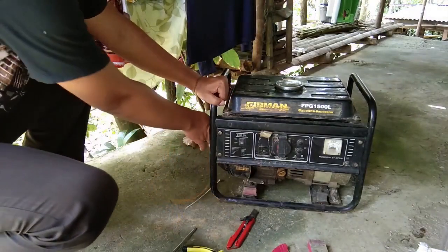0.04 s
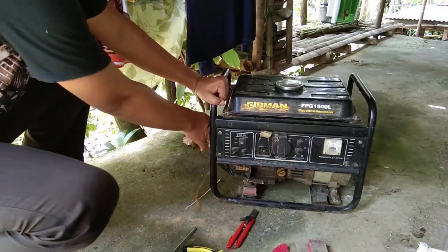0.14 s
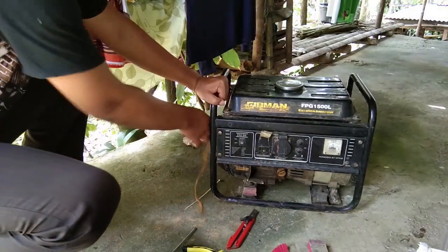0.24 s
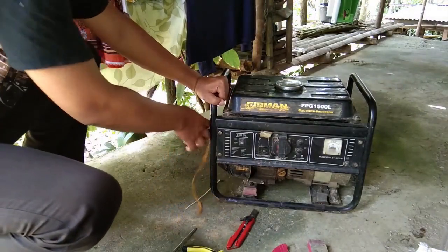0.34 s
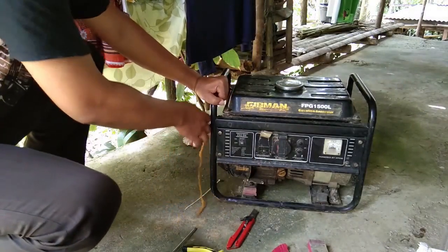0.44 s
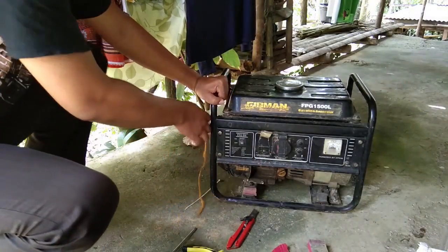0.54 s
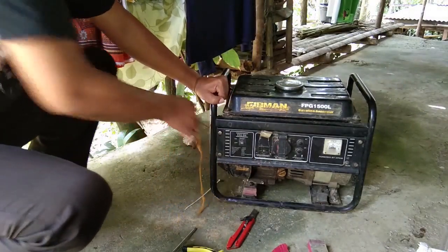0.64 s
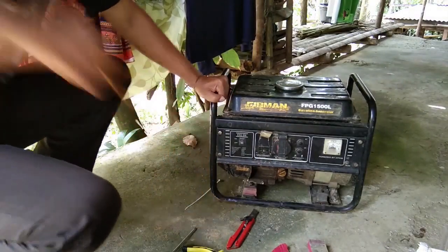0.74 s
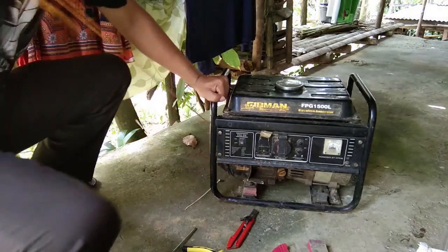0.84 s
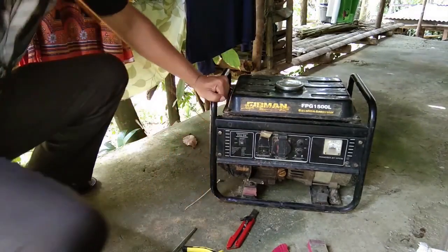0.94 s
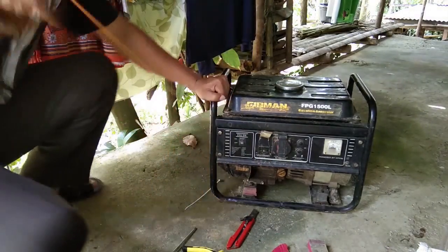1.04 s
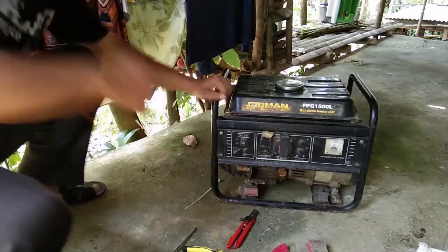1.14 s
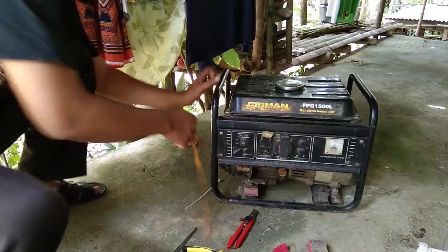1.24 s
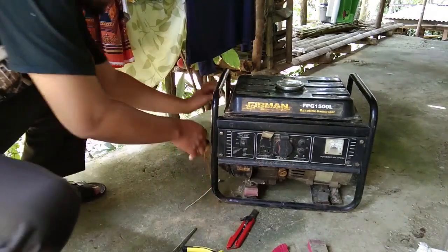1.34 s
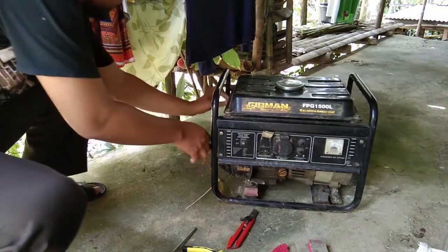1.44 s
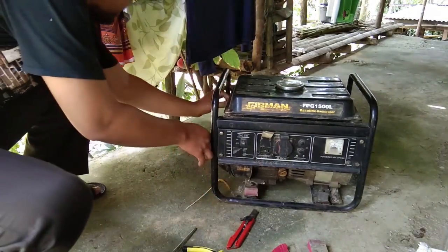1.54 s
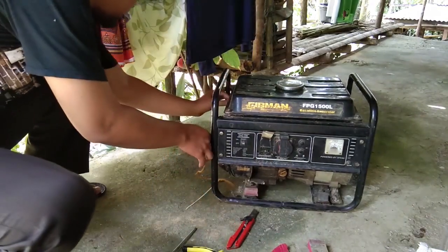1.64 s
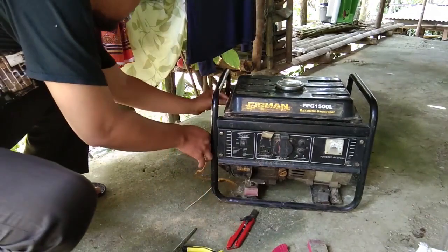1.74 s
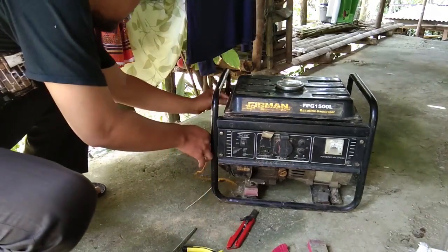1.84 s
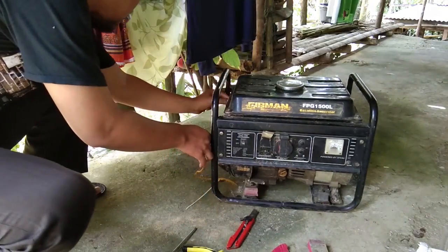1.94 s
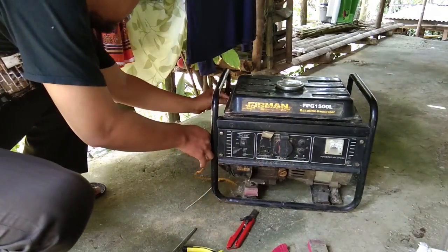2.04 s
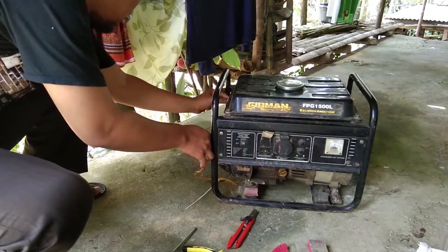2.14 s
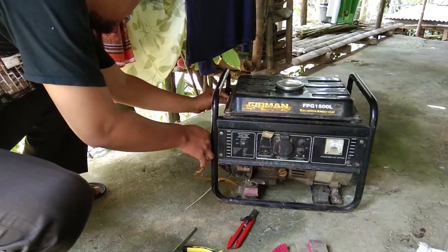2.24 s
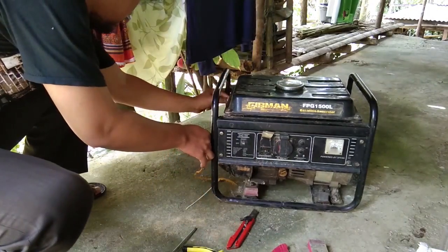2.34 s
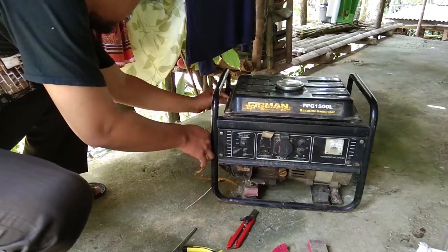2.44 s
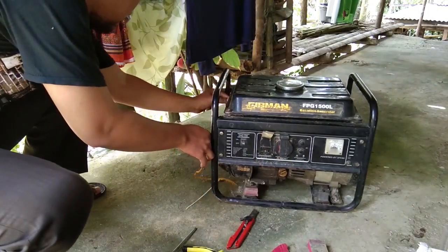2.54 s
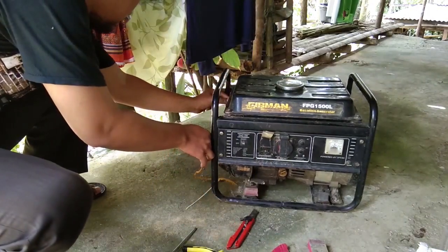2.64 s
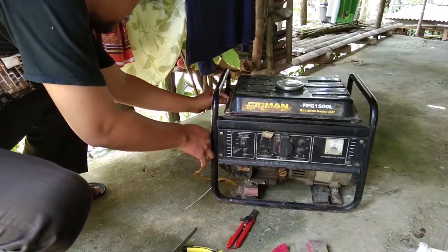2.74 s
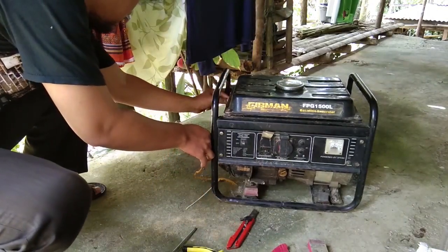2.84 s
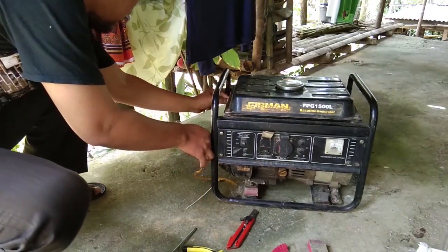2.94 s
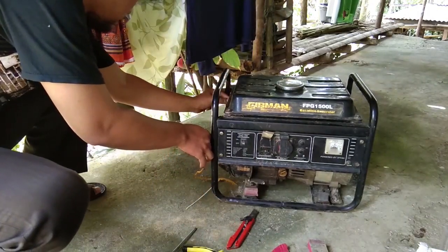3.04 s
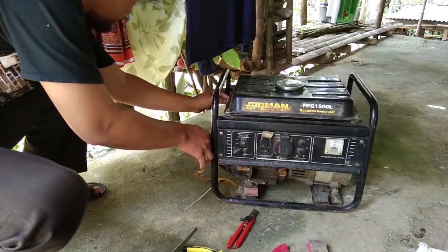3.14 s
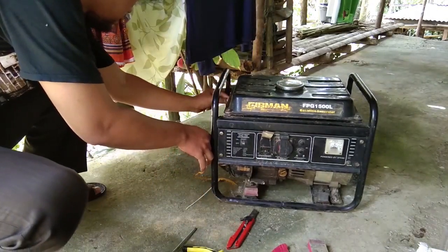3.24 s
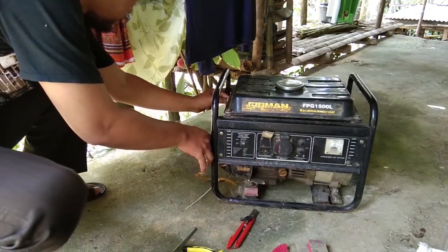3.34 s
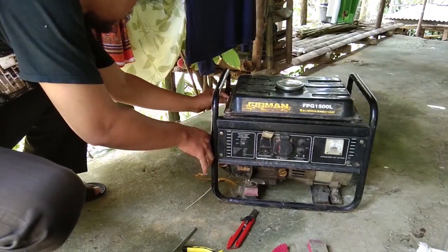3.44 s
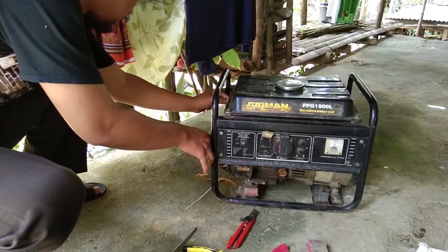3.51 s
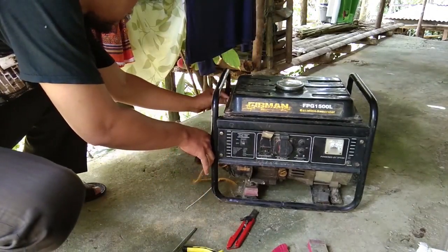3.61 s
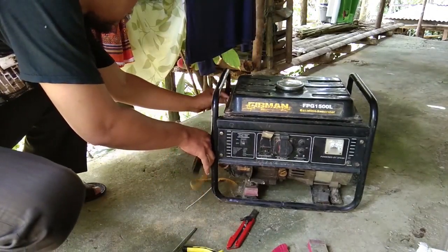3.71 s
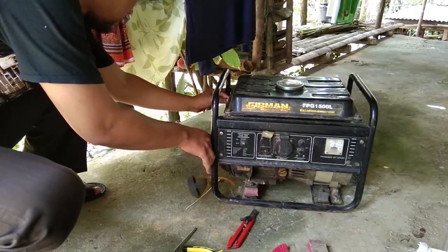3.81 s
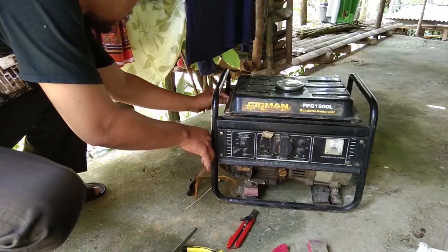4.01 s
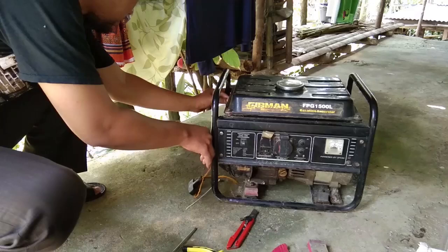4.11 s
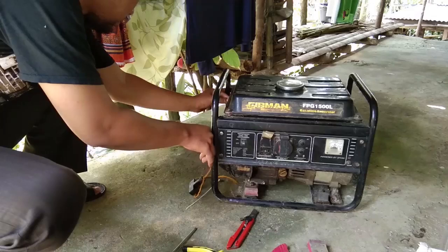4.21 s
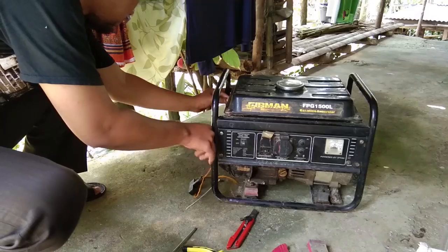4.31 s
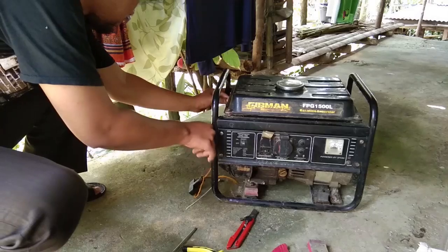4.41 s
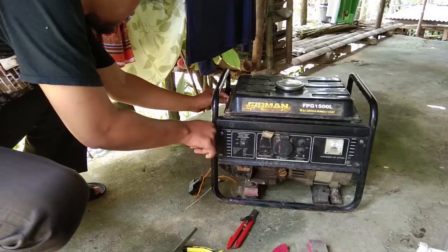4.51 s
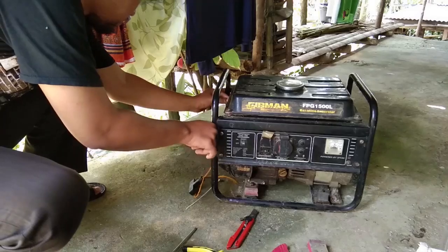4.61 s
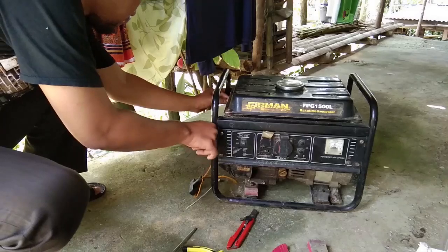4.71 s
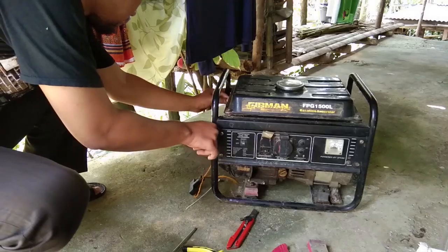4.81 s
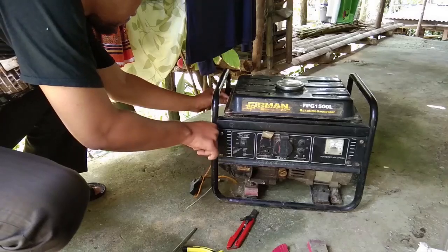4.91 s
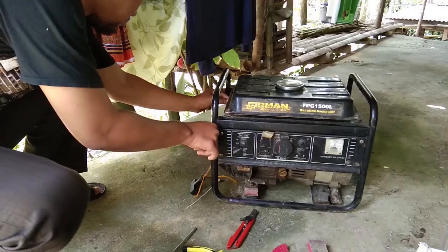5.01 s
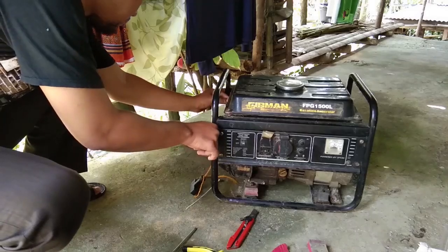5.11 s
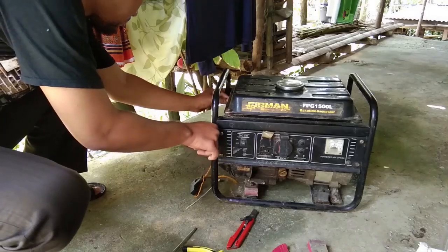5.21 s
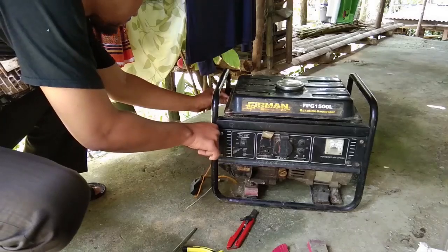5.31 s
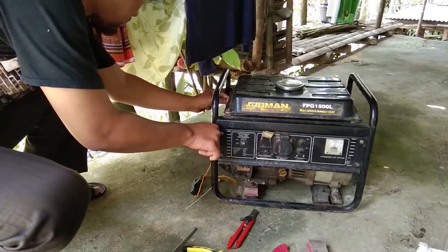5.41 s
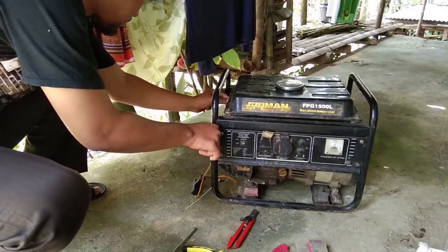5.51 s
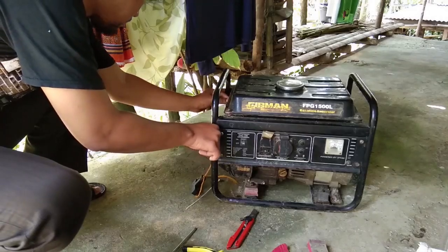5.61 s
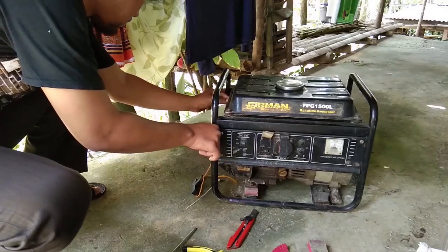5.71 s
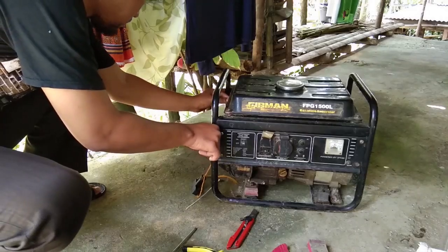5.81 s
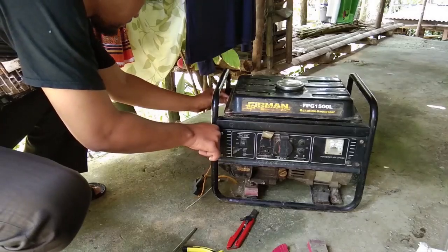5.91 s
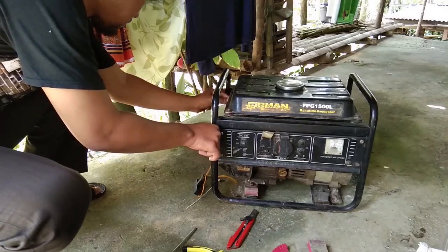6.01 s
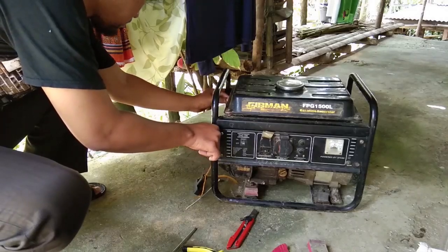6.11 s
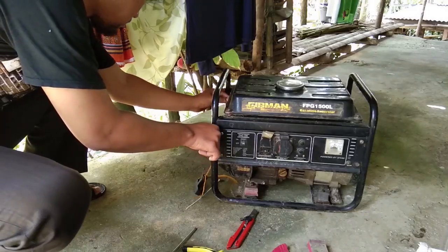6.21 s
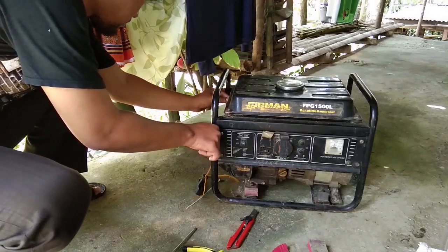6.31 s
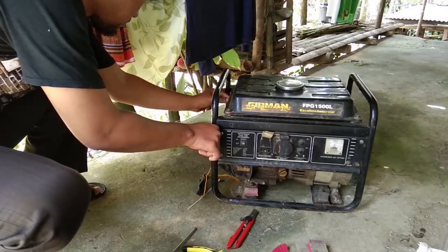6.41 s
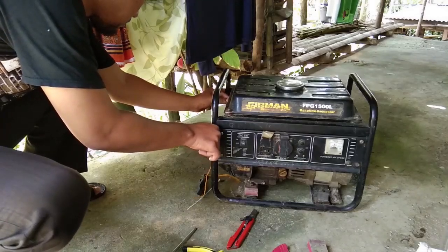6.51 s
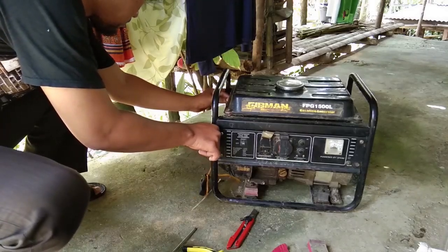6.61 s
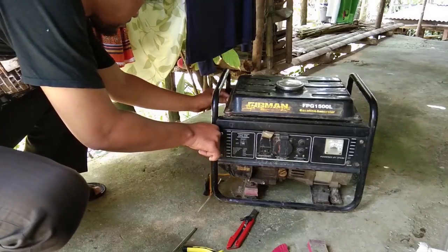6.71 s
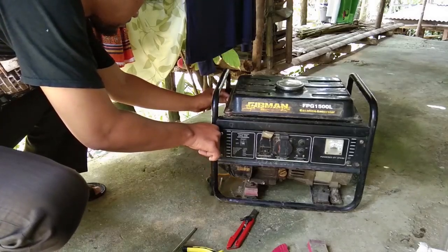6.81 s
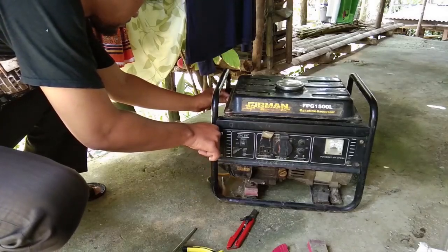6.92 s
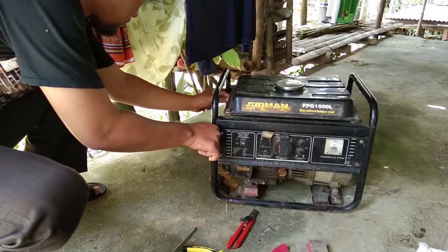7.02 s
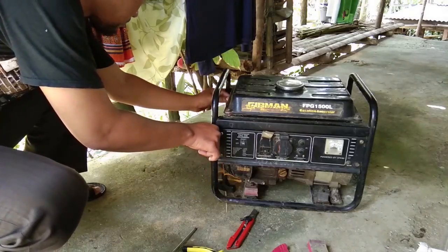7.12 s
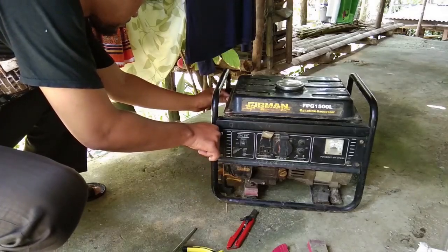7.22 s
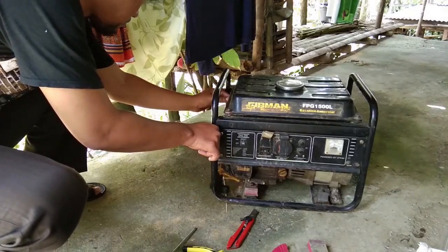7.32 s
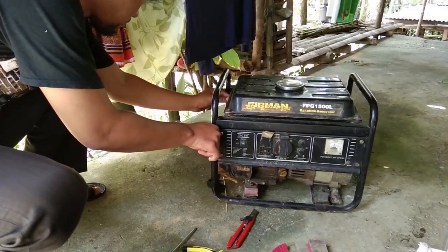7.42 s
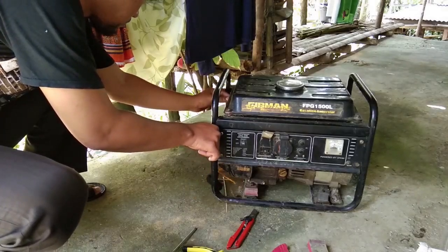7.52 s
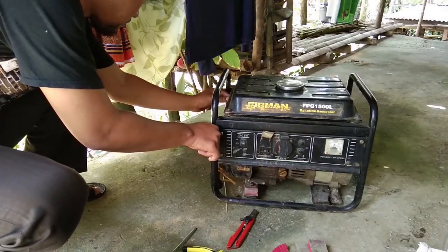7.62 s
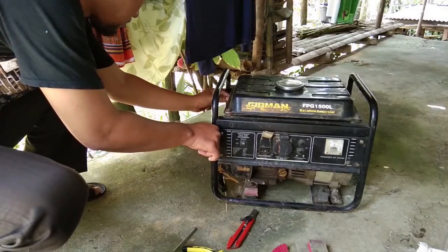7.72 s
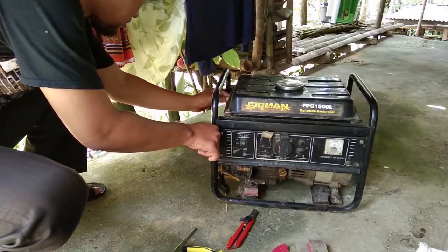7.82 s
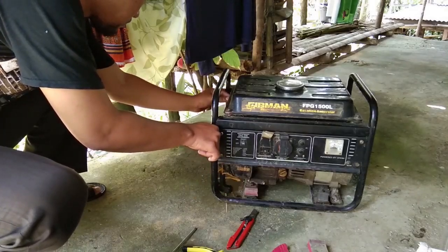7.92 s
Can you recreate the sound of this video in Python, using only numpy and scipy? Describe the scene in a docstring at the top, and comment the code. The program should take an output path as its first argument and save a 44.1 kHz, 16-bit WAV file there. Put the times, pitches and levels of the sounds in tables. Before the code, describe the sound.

Quiet clicks, a harsh rope pull and muffler puffs, then a small four-stroke engine catches, sags, picks up and putters on steadily with metallic clatter.

```python
"""A small four-stroke petrol generator is pull-started on a concrete floor under an open shelter, in a quiet yard.
The starter clicks, the rope rasps as shaped noise and the muffler puffs: compressions, then first firing.
The engine catches, nearly stalls, picks up and lopes: strong and weak burns alternate, with a few stumbles.
Each burn excites the muffler resonances and a rush of gas noise; one burn spits sharply.
Valves and piston knock on every cycle, and damped modes of the casing ring on."""
import sys
import numpy as np
from scipy import signal
from scipy.fft import rfft, irfft, next_fast_len
from scipy.io import wavfile
from scipy.ndimage import uniform_filter1d

SR = 44100
rng = np.random.default_rng(int(sys.argv[2]) if len(sys.argv) > 2 else 0)


def inscribe(sig):
    """Save sig as 16-bit PCM at rate SR to the path in sys.argv[1].

    A 1-D sig is mono; a 2-D sig holds one channel per row.
    Samples are clipped to [-1, 1] before scaling.
    """
    pcm = np.round(np.clip(np.atleast_2d(sig).T, -1, 1) * 32767)
    wavfile.write(sys.argv[1], SR, pcm.astype(np.int16))


N = 350595
TIME = np.arange(N) / SR
FIRST_CYCLE_S = 1.182
CRUISE_RATE = 21.66  # cycles per second: reference speed for the levels

# colour of the gas pushed by the piston, before scaling to rms 1: frequency_hz, density_db (per Hz)
GAS_SPECTRUM = [(200, -31), (600, 2), (800, 11.5), (1200, -8), (2100, -12.5), (3000, -7), (4500, 4.5),
                (5900, 2.5), (6700, 3), (7600, -32)]


def amp(db):
    """Level definition: decibels to linear gain."""
    return 10 ** (np.asarray(db) / 20)


def level(x, db):
    """Energy normalisation: scale a signal to an rms level in dB."""
    return x * amp(db) / np.sqrt(np.mean(x ** 2))


def noise(spectrum):
    """Spectral shaping: white noise weighted in frequency, with rms 1."""
    hz, db = np.transpose(spectrum)
    size = next_fast_len(N)
    f = np.fft.rfftfreq(size, 1 / SR) + 1e-3  # keeps the logarithm finite
    weights = amp(np.interp(np.log(f), np.log(hz), db))
    white = rng.standard_normal(size)
    return level(irfft(rfft(white) * weights, size)[:N], 0)


def through(x, response):
    """Linear superposition: convolve a sound with an impulse response."""
    return signal.oaconvolve(x, response)[:N]


def pulses(times, sizes):
    """Impulsive excitation: one single-sample impulse at each time."""
    return np.bincount(np.clip(times * SR, 0, N).astype(int), sizes, N + 1)[:N]


def ring(modes):
    """Damped resonance: decaying sines, normalised so that each has its dB gain at the centre frequency."""
    t = TIME[:SR // 5]
    response = 0
    for hz, width, db in modes:
        decay = np.exp(-np.pi * width * t)
        response = response + amp(db) * 2 * np.pi * width / SR * decay * np.sin(2 * np.pi * hz * t)
    return response


def burst(rise_s, decay_s):
    """Charge and discharge: an envelope that swells and dies away exponentially, with peak 1."""
    t = TIME[:SR // 4]
    shape = (1 - np.exp(-t / rise_s)) * np.exp(-t / decay_s)
    return shape / shape.max()


def grain(rate, spread_db, decay_s):
    """Random impulse train: many tiny bursts of uneven size make a gritty envelope of rms 1."""
    chance, size = rng.random(N), rng.standard_normal(N)
    bursts = (chance < rate / SR) * amp(spread_db * np.clip(size, -2, 2))
    return level(signal.lfilter([1], [1, -np.exp(-1 / (decay_s * SR))], bursts), 0)


def cycle_rate():
    """Rotational kinematics: four-stroke cycles per second, straight lines between the given points."""
    # engine speed: time_s, rate (cycles per second)
    speed_points = [(1.18, 13.63), (1.35, 16.83), (1.81, 14.79), (2.13, 12.06), (2.58, 20.39),
                    (2.87, 18.45), (3.32, 17.2), (3.81, 18.85), (4.02, 17.71), (4.2, 18.36), (4.62, 17.86),
                    (5.16, 20.12), (5.46, 19.82), (5.63, 18.54), (6.11, 18.04), (6.62, 21.79),
                    (7.49, 24.25), (7.95, 24.2)]
    time_s, rate = np.transpose(speed_points)
    return np.interp(TIME, time_s, rate)


def effort(db_per_rate, choked_db):
    """Load dependence: gain follows engine speed, with an offset while the cold engine runs choked."""
    clears_s, clearing_s = 2.245, 0.025
    choked = np.clip(1 - (TIME - clears_s) / clearing_s, 0, 1)
    return amp(db_per_rate * (cycle_rate() - CRUISE_RATE) + choked_db * choked)


def throttle(db_per_gain=.2, limit=7):
    """Intake opening: gain rises as the engine gathers speed (dB per cycle per second gained each second)."""
    gaining = uniform_filter1d(np.gradient(cycle_rate()) * SR, size=SR // 8)
    return amp(db_per_gain * np.clip(gaining, -limit, limit))


def cycles():
    """Residual-gas alternation: a strong burn spoils the next charge, a weak one leaves it clean.

    Returns the start, length and burn strength of each cycle."""
    # spells when every cycle burns alike: from_s, to_s, burn_db (before the speed gain)
    # they cover catching, nearly stalling, picking up, then stumbles
    spells = [(1.14, 1.41, -0.5), (1.72, 2.08, -10), (2.23, 2.3, -1.5), (2.3, 2.54, -1.5),
              (5.34, 5.39, -0.5), (5.54, 5.59, -23), (5.59, 5.70, -5.5), (5.92, 6.03, -6)]
    spoiled_db, spoils_above_db = -11, -5
    rate = cycle_rate()
    running = TIME >= FIRST_CYCLE_S
    turns = np.cumsum(rate * running) / SR
    starts = np.interp(np.arange(int(turns[-1]) + 1), turns[running], TIME[running])
    burn_db, spoiled = [], False
    for start in starts:
        spell = [db for begin, end, db in spells if begin <= start < end]
        if spell:
            burn_db.append(spell[0])
        else:
            burn_db.append(spoiled_db if spoiled else 0)
        spoiled = burn_db[-1] > spoils_above_db
    burn = amp(burn_db) * np.interp(starts, TIME, effort(db_per_rate=0.22, choked_db=1.0))
    return starts, 1 / np.interp(starts, TIME, rate), burn


def yard():
    """Diffuse background: steady, faint noise with the colour of a quiet yard."""
    # before scaling: frequency_hz, density_db (per Hz)
    yard_spectrum = [(15, -38), (25, -7.5), (121, 5), (175, -7), (215, -1.5), (290, -11.5), (410, -9),
                     (550, -15.5), (740, -15), (850, -10.5), (950, -20), (1300, -17.5), (1550, -22.5),
                     (1770, -17), (2250, -24), (2950, -29.5), (3550, -21.5), (4500, -27), (6910, -22),
                     (7600, -38), (9880, -56.5), (16700, -120)]
    return amp(-54.5) * noise(yard_spectrum)


def shelter(x, t60_s=0.27, bounce_s=0.0006167, bounce_db=-13):
    """Reflection and scattering: the floor mirrors the sound, roof and posts scatter a short, light tail."""
    x = x + amp(bounce_db) * np.interp(TIME - bounce_s, TIME, x, left=0)
    t = TIME[:SR // 2]
    tail = rng.standard_normal(len(t)) * amp(-60 * t / t60_s) * (t > .003)
    # the bass escapes through the open sides
    tail = signal.sosfilt(signal.butter(2, 400, "high", fs=SR, output="sos"), tail)
    return x + amp(-13) * through(x, tail / np.linalg.norm(tail))


def casing(x):
    """Modal resonance: casing, tank and frame modes lift narrow bands and ring on, with hollows between."""
    # peaks and hollows: frequency_hz, width_hz, lift_db (of its own filter)
    casing_modes = [(257.1, 6.6, 7.5), (287.2, 20, -1.5), (340, 15, -5), (370, 18, 1), (404.5, 25, -4.5),
                    (456, 14, 1.5), (500, 17, 1.5), (545, 13, 3.5), (594, 12, 4), (594, 24, -2),
                    (641, 19.6, 8), (786, 91, -11), (939, 92, 5), (1056, 46, 4.5), (1213, 62, -2),
                    (1250, 29.3, 8), (1446, 41, -4), (1446, 26, 7.5), (1516, 78, -3.5), (1650, 36, 2.5),
                    (1886, 36, 5), (2100, 92, 1), (2383, 147, 5.5), (2557, 75, 8), (2800, 70, -0.5),
                    (3910, 190, 5), (4770, 58, 0.5), (5700, 180, 5.5), (6340, 46, 0)]
    for hz, width, db in casing_modes:
        x = x + (amp(db) - 1) * signal.lfilter(*signal.iirpeak(hz, hz / width, fs=SR), x)
    return x


def rope_speed():
    """Driven friction: each run of the rope sets in quickly, changes level along the pull and dies away."""
    # rope taken up, pulled hard, coasting, winding back: start_s, end_s, first_db, last_db
    rope_runs = [(0.616, 0.654, -65, -47), (0.657, .74, -37.5, -36.5), (0.739, 0.888, -33.5, -30),
                 (0.904, 1.054, -37.5, -35.5), (1.075, 1.175, -27, -30)]
    attack_s, release_s = .003, 0.018
    gain = 0
    for begin, end, first_db, last_db in rope_runs:
        edges = np.minimum(TIME - begin, 0) / attack_s - np.maximum(TIME - end, 0) / release_s
        run = amp(np.interp(TIME, [begin, end], [first_db, last_db])) * np.exp(edges)
        gain = np.maximum(gain, run)
    return gain


def starter():
    """Friction and impact: the rope scrapes its guide, pawls and handle clack, the frame tube rings."""
    # colours before scaling to rms 1: frequency_hz, density_db (per Hz)
    rope_spectrum = [(88, -44), (150, -5), (250, -3), (380, 6), (550, 11), (640, 6.5), (750, 9.5),
                     (920, 7.5), (1250, 2.5), (1600, 4), (2110, 1), (2530, 3), (4140, 0.5), (6000, 2),
                     (7000, -0.5), (7600, -42), (9880, -43), (16700, -120)]
    metal_spectrum = [(120, -53), (200, -50), (1240, -19.5), (1600, -34), (2700, -21), (3400, -20),
                      (4070, -12.5), (4600, -18), (6900, -17.5), (7600, -23), (9880, -50), (16700, -120)]
    handle_spectrum = [(120, -7), (350, -5), (500, -10), (720, 2), (1000, -12), (1300, -9), (1850, -1.5),
                       (2400, -9), (4000, 0), (7600, -29), (16700, -120)]
    # clacks of pawls (bright metal) and handle (dull): time_s, metal_db, handle_db
    clacks = [(0.099, -52, -49.5), (.257, -55, -43), (.291, -42, -44), (0.3, -35.5, -35.5),
              (0.457, -51, -62), (0.659, -54, -41), (0.669, -45, -36), (0.748, -45, -42), (0.799, -32, -30),
              (0.846, -25, -38), (.869, -20, -37), (0.882, -18.5, -39), (0.894, -30.5, -34),
              (1.073, -34, -44), (1.148, -24.5, -42)]
    # ring of the frame tube, relative within the tube: frequency_hz, width_hz, level_db
    tube_modes = [(730, 24, 6), (1214, 18, -1), (1860, 24, -1), (3120, 40, 0.5), (3860, 24, -3)]
    rope = noise(rope_spectrum) * rope_speed() * (.55 + .5 * grain(rate=400, spread_db=4, decay_s=.002))

    clack_s, metal_db, handle_db = np.transpose(clacks)
    crack_s, ring_s, ring_share = 0.0012, 0.022, 0.51
    t = TIME[:SR // 4]
    fade = (1 - ring_share) * np.exp(-t / crack_s) + ring_share * np.exp(-t / ring_s)
    metal = through(pulses(clack_s, amp(metal_db)), fade) * noise(metal_spectrum)
    blows = pulses(clack_s, amp(handle_db))
    tube = ring(tube_modes)
    tube_ring = amp(-2) * through(blows, tube / tube.max())
    handle = through(blows, fade) * noise(handle_spectrum) + tube_ring
    return rope + metal + handle


def hum():
    """Harmonic excitation: crank and alternator hum on whole multiples of the cycle rate."""
    # tones that glide with the engine speed, before the speed gain: order (multiple of cycle rate), level_db
    hum_orders = [(6, -47), (10, -45), (17, -50.5), (20, -53), (23, -48)]
    turns = np.cumsum(cycle_rate()) / SR
    running = np.clip((TIME - FIRST_CYCLE_S) / .2, 0, 1)
    tones = sum(amp(db) * np.sin(2 * np.pi * order * turns) for order, db in hum_orders)
    return tones * running * effort(db_per_rate=2.0, choked_db=-19)


def air(starts, lengths):
    """Turbulent flow: the fan hisses, the piston pumps out a little gas and a tappet ticks every cycle."""
    # colour of the fan before scaling to rms 1: frequency_hz, density_db (per Hz)
    fan_spectrum = [(40, -17.5), (100, 12.5), (300, -3), (550, 8.5), (790, 2), (1050, 2), (2100, -4),
                    (2500, 0.5), (3100, -2.5), (4700, -5), (6300, -1.5), (7600, -34)]
    each = np.ones(len(starts))
    pumped = through(pulses(starts + 0.23 * lengths, each), burst(rise_s=0.0074, decay_s=0.022))
    tappet = through(pulses(starts + 0.96 * lengths, each), burst(rise_s=0.004, decay_s=0.0016))
    running = np.clip((TIME - 1.08) / 0.13, 0, 1)
    fan = amp(-28.0) * running * noise(fan_spectrum)
    every_cycle = (amp(-30.5) * pumped + amp(-34) * tappet) * noise(GAS_SPECTRUM)
    return (fan + every_cycle) * effort(db_per_rate=0.87, choked_db=0.16)


def rocking(starts, lengths):
    """Inertial forcing: the piston shakes the engine twice a cycle, burning or not: a low rumble."""
    # low resonances of the rocking engine and its frame, relative: frequency_hz, width_hz, level_db
    body_modes = [(84, 4.1, -14.5), (93, 30, -0.5), (137.6, 34, 8.5), (186.8, 19, 4), (244, 26, 0.5)]
    chance = rng.standard_normal((len(starts), 4)).T
    first = pulses(starts + .17 * lengths + .0002 * chance[0], amp(chance[1]))
    second = pulses(starts + .49 * lengths + .0002 * chance[2], amp(-2 + chance[3]))
    rumble = level(through(first + second, ring(body_modes)), -37.5)
    return rumble * effort(db_per_rate=0.95, choked_db=-4.0)


def chuff(from_hz, to_hz, length_s):
    """Frequency sweep: a short pressure swell whose pitch rises and whose end is rounded."""
    u = np.clip(TIME[:SR // 40] / length_s, 0, 1)
    turns = length_s * (from_hz * u + (to_hz - from_hz) * u ** 2 / 2)
    swell = abs(np.sin(np.pi * u ** 1.6)) ** 1.4
    return swell * np.sin(2 * np.pi * turns)


def mechanism(starts, lengths, burn, scatter_db=1.5):
    """Periodic impact: chuffs and knocks recur every cycle, and the knocks set loose panels chattering."""
    # two upward sweeps per cycle: place (0-1 of the cycle), from_hz, to_hz, length_s, level_db (relative)
    chuff_strokes = [(.166, 190, 690, .0098, 0), (.442, 140, 690, .0122, -1.2)]
    # knocks of valves and piston, relative levels: place (0-1 of the cycle), frequency_hz, width_hz,
    # ring_db, chatter_db, growth_db (per extra cycle per second)
    knock_strokes = [(.243, 1060, 300, 7.5, -6.5, 0), (.272, 2570, 390, -2.5, -17.5, -1.5),
                     (.303, 1238, 131.7, 0.5, -3.5, -1.2), (.303, 2586, 200, 2.5, -7, 0),
                     (.447, 1048, 85, 2.5, -17.5, -0.9), (.447, 1426, 90, -3, -20, -1),
                     (.81, 1150, 450, -6, -7.5, -2), (0.989, 2570, 300, -2, 2.5, -1.1),
                     (.025, 1790, 300, -2, -9.5, 4)]
    # colour of the panels before scaling to rms 1: frequency_hz, density_db (per Hz)
    rattle_spectrum = [(300, -28), (800, -14.5), (1150, 2.5), (1500, 2.5), (2100, 2), (2500, 6), (3000, -3),
                       (4200, 2.5), (6300, -6.5), (7600, -33)]
    lope_s = 0.00051  # a burn hurries the crank: strokes come this early per unit of burn strength

    def strokes(place):
        """Cyclic timing: times and sizes of one stroke in every cycle, with slight scatter."""
        chance = rng.standard_normal((len(starts), 2)).T
        jitter = .00006 * chance[0]
        return starts + place * lengths - lope_s * burn + jitter, amp(scatter_db * chance[1])

    chuffs = 0
    for place, from_hz, to_hz, length_s, db in chuff_strokes:
        chuffs = chuffs + amp(db) * through(pulses(*strokes(place)), chuff(from_hz, to_hz, length_s))
    knocks, shakes = 0, 0
    for place, hz, width, db, chatter_db, growth_db in knock_strokes:
        times, sizes = strokes(place)
        hits = pulses(times, sizes * amp(growth_db * (1 / lengths - CRUISE_RATE)))
        # the root of the width evens out the energy of narrow and wide rings
        knocks = knocks + through(hits, ring([(hz, width, db)])) / np.sqrt(width)
        shakes = shakes + amp(chatter_db) * hits
    chatter = through(shakes, burst(rise_s=0.0025, decay_s=.0045)) * noise(rattle_spectrum)
    clatter = level(knocks, -35.0) + level(chatter, -36.5)
    chuffs = level(chuffs, -31.0) * effort(db_per_rate=0.56, choked_db=-9.5) * throttle()
    return chuffs + clatter * effort(db_per_rate=0.1, choked_db=-5.0)


def exhaust(starts, lengths, burn):
    """Pulsed outflow: burns thump the muffler, bark in the tailpipe and rush; the rising piston pushes more."""
    # muffler resonances, relative: frequency_hz, width_hz, level_db
    muffler_modes = [(88.6, 7, -12.5), (110.3, 26.7, 18), (152, 60, 8.5), (178, 36, -8), (487, 290, -1.5)]
    # muffler puffs of the start, relative: time_s, level_db
    # compressions on the rope, then first firing and afterpuffs
    start_puffs = [(0.851, -9.5), (0.966, -10), (0.973, -16), (1.009, -13.5), (1.095, 4), (1.128, -1.5),
                   (1.148, -8), (1.167, -3.5)]
    # colours of tailpipe bark and gas jet before scaling to rms 1: frequency_hz, density_db (per Hz)
    bark_spectrum = [(150, -33.5), (330, -11), (480, -9), (660, 6), (850, -8), (1500, -32), (7600, -49)]
    jet_spectrum = [(200, -27), (600, -5.5), (1200, -7), (2100, -5.5), (3200, -9), (4500, -5.5), (5900, -1),
                    (6700, -3), (7600, -17)]
    chance = rng.standard_normal((len(starts), 3)).T
    sizes = burn * amp(.9 * chance[0])
    opens = starts + .0004 * chance[1]
    puff_s, puff_db = np.transpose(start_puffs)
    puffs = pulses(puff_s - .003, amp(puff_db))

    thump = level(through(pulses(opens - .0017, sizes) + puffs, ring(muffler_modes)), -31.5)
    thump = thump * effort(db_per_rate=-0.27, choked_db=-2.0)
    bark_hits = pulses(opens - .001, sizes) + amp(0.5) * puffs
    bark = amp(-28.5) * through(bark_hits, burst(rise_s=0.0059, decay_s=0.0049)) * noise(bark_spectrum)

    rush_hits = pulses(opens - .0018, sizes * amp(1.2 * chance[2]))
    rush = through(rush_hits, burst(rise_s=0.012, decay_s=0.0095))
    rush = uniform_filter1d(rush, size=SR // 200)
    push = through(pulses(starts + 0.19 * lengths, sizes), burst(rise_s=0.0064, decay_s=.011))
    # one sharp spit out of the tailpipe
    spit = through(pulses(np.array([4.2555]), amp([-21])), burst(rise_s=.0008, decay_s=.0012))
    gas = (amp(-23.5) * rush + spit) * noise(jet_spectrum) + amp(-28.5) * push * noise(GAS_SPECTRUM)
    return thump + (bark + gas) * effort(db_per_rate=0.16, choked_db=-3.0)


def scene():
    """Superposition: starter and engine ring the casing under the shelter, over a quiet yard."""
    starts, lengths, burn = cycles()
    engine = hum() + air(starts, lengths) + rocking(starts, lengths)
    engine = engine + mechanism(starts, lengths, burn) + exhaust(starts, lengths, burn)
    return (yard() + shelter(casing(starter() + engine)))[None]


def record(dry):
    """Band limiting: a phone microphone thins the deep bass and cuts the top."""
    thin = signal.sosfilt(signal.butter(4, 65, "high", fs=SR, output="sos"), dry)
    return signal.sosfilt(signal.ellip(10, .2, 80, 7350, fs=SR, output="sos"), thin)


dry = scene()
out = record(dry)
inscribe(out)
```